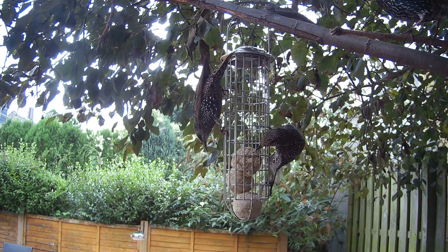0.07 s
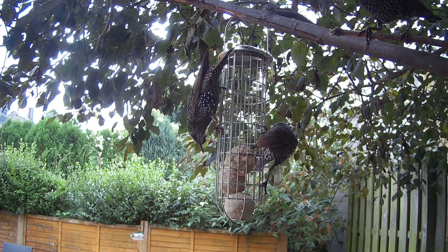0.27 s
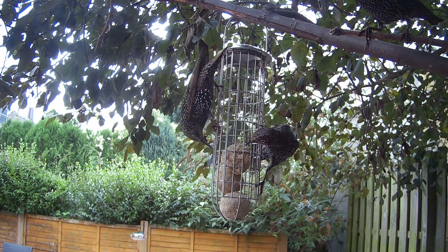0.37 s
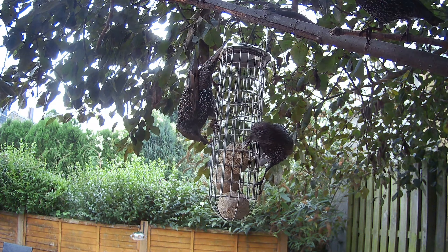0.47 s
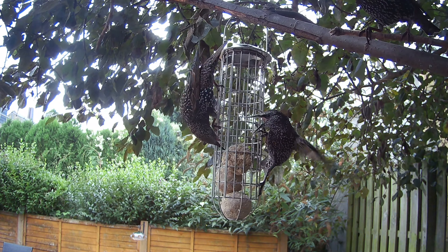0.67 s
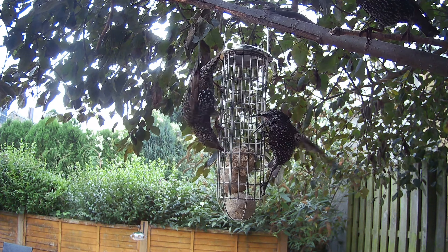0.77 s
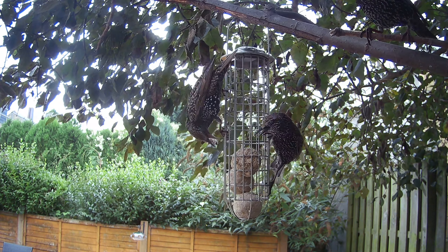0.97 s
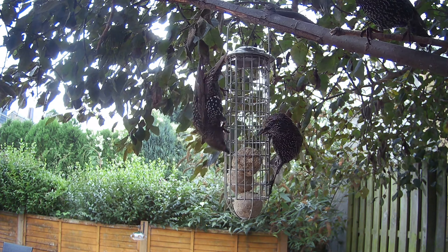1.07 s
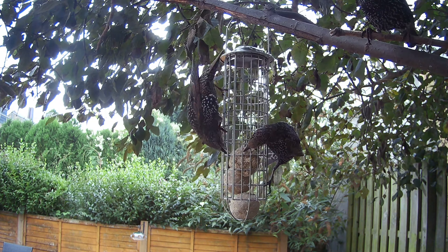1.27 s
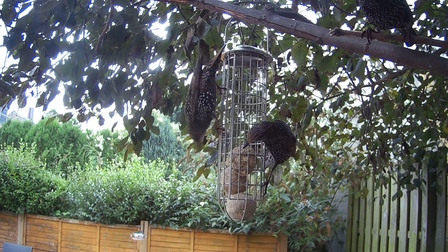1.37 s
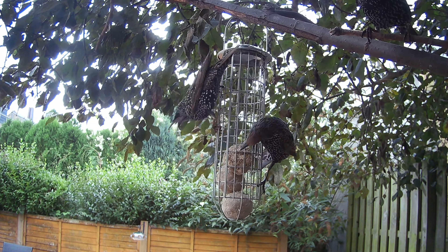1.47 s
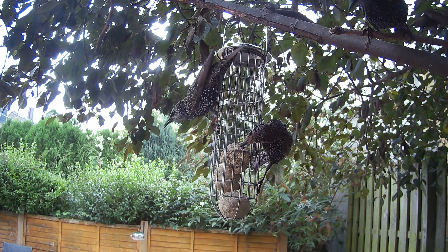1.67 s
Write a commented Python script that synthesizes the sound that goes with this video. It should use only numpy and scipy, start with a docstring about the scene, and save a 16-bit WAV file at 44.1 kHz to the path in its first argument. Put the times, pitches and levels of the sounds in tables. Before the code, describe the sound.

Starling chatter in a garden, raspy squeaks and snaps turning to high descending whistles and rapid clicking

```python
"""Starlings squabble at a garden feeder a couple of metres from a mono camera microphone, over a dull town rumble.
First a nasal squeak, then a scratchy two-voiced warble of unsteady near sines, peeps, rustling noise and
bill snaps: cracks in a broad resonance. Then thin whistles overlap, two of them falling in steps, with faint
treble hiss and a click trill that rings the throat; fences and walls give a short ring. Last the rumble, shaped
noise with a faint hum, eases off, leaving a far call and faint snaps; soft low blips come and go throughout."""
import sys
import numpy as np
from scipy import signal
from scipy.fft import rfft, irfft
from scipy.io import wavfile
from scipy.ndimage import uniform_filter1d

SR = 44100
rng = np.random.default_rng(int(sys.argv[2]) if len(sys.argv) > 2 else 0)


def persist_wave(psi):
    """Save psi, clipped to +-1, as 16-bit WAV."""
    counts = np.round(np.clip(psi, -1, 1) * 32767).astype(np.int16)
    wavfile.write(sys.argv[1], SR, np.atleast_2d(counts).T)


def natural_amplitude(level_db):
    """Convert a level in decibels to a linear amplitude factor, elementwise."""
    exponent = np.asarray(level_db, float) / 20
    return 10 ** exponent


N = 74970

# Pitch tracks of the whistles: points (t/s, f/Hz, level/dB); the ends and peeps are lists of such tracks
FIRST_FALL = [(0.53, 7540, -47), (0.535, 7770, -29), (0.5435, 8050, -21), (0.551, 7820, -15),
              (0.5645, 8460, -17), (0.587, 8230, -14), (0.5905, 8350, -19), (0.5935, 7950, -14),
              (0.5975, 8180, -17), (0.601, 7640, -16), (0.6045, 7580, -15), (0.608, 6910, -15),
              (0.614, 7110, -15), (0.621, 6720, -15), (0.625, 5230, -12), (0.636, 5660, -10),
              (0.6415, 5210, -13), (0.644, 4540, -14), (0.6505, 4670, -17), (0.6565, 4240, -23),
              (0.6585, 4610, -24), (0.666, 4090, -37)]
SECOND_FALL_START = [(0.854, 8310, -24), (0.859, 8350, -13), (0.8655, 8460, -12), (0.878, 8480, -17),
                     (0.9055, 8330, -22), (0.916, 8290, -21), (0.94, 7970, -22)]
SECOND_FALL_STEPS = [(0.943, 7990, -22), (0.9565, 7470, -22), (0.959, 6500, -16), (0.9615, 6180, -7),
                     (0.9645, 6070, -9), (0.97, 6460, -9), (0.974, 5990, -13), (0.978, 5040, -14),
                     (0.9855, 5230, -9), (0.989, 4970, -16), (0.9915, 5020, -13), (0.9955, 4520, -16),
                     (1.003, 4540, -19), (1.013, 4110, -23), (1.015, 4370, -17), (1.02, 4160, -26)]
FALL_ENDS = [
    [(.6565, 4304, -34.5), (.662, 3720, -27.5), (.666, 3755, -53)],
    [(1.012, 4341, -10.5), (1.018, 3760, -44.5), (1.022, 3850, -33)],
]
HELD_WHISTLE = [(0.622, 8030, -30), (0.6255, 8270, -27), (0.635, 8350, -20), (0.6425, 8120, -18),
                (0.6535, 8120, -16), (0.661, 8070, -20), (0.666, 8180, -15), (0.673, 8250, -16),
                (0.6755, 8440, -20), (0.677, 8400, -18), (0.68, 8590, -15), (0.686, 8740, -15),
                (0.693, 8790, -10), (0.7075, 8830, -12), (0.7225, 8720, -9), (0.727, 8590, -17),
                (0.7295, 8680, -14), (0.767, 8890, -8), (0.8025, 8870, -10), (0.819, 8740, -12),
                (0.8355, 8760, -9), (0.852, 8700, -16)]
HELD_WHISTLE_END = [(0.856, 8700, -15), (0.879, 8700, -20), (0.904, 8630, -17), (0.9165, 8660, -23),
                    (0.9345, 8530, -23), (0.9375, 8550, -26), (0.94, 8660, -34)]
PEEPS = [
    [(0.174, 6290, -42), (0.177, 4800, -33), (0.178, 5150, -34), (0.179, 5960, -34), (0.181, 6460, -28),
     (0.1835, 5810, -26), (0.185, 5710, -25), (0.2035, 5990, -28), (0.2095, 5990, -19), (0.2195, 6550, -20),
     (0.2215, 6440, -21), (0.226, 7060, -36)],
    [(0.375, 5490, -38), (0.3815, 6240, -23), (0.383, 6350, -22), (0.388, 5920, -19), (0.39, 5860, -20),
     (0.398, 6010, -14), (0.404, 5900, -18), (0.4125, 5990, -20), (0.418, 6240, -14), (0.421, 6570, -22),
     (0.424, 6520, -23)],
]
# Quiet notes under and between the whistles: points (t/s, f/Hz, level/dB); the last two are lists of tracks
UNDER_FIRST_FALL = [(0.542, 4612, -40.5), (0.552, 4559, -28.5), (0.568, 5043, -42), (0.574, 4983, -41.5),
                    (0.586, 4503, -26.5), (0.602, 4335, -35.5), (0.61, 4185, -22.5), (0.614, 4274, -59)]
UNDER_SECOND_FALL = [(0.866, 5424, -31.5), (.876, 5200, -33), (.89, 5100, -28.5), (0.902, 4839, -29),
                     (.934, 4572, -28.5), (0.963, 4230, -43), (0.989, 3770, -49), (0.999, 3520, -50)]
SMALL_NOTES = [
    [(.521, 5750, -36), (.527, 5550, -31), (.534, 5250, -42)],
    [(.878, 5550, -36), (.888, 5400, -32), (.897, 5200, -38)],
]
QUIET_NOTES = [
    [(.708, 2500, -42), (.712, 2780, -31), (.726, 2200, -37), (.742, 2020, -36), (.752, 1750, -36),
     (.757, 1550, -48)],
    [(.39, 2850, -32), (.399, 2550, -35)],
    [(.401, 1492, -39), (.43, 1497, -50)],
    [(.19, 4900, -42), (.198, 5150, -40), (.207, 4850, -39), (.216, 5300, -44)],
]
# Upper and lower voice of the warble: lists of tracks of points (t/s, f/Hz, level/dB)
UPPER_VOICE = [
    [(0.07, 3060, -41), (0.0795, 3490, -43), (0.093, 2930, -34), (0.098, 4180, -41), (0.102, 2800, -38),
     (0.1035, 4050, -38), (0.106, 4410, -31), (0.109, 2760, -33), (0.113, 4390, -40), (0.1145, 4220, -41),
     (0.1155, 3510, -40), (0.118, 2800, -33), (0.1255, 3980, -34), (0.1285, 3060, -38), (0.131, 2860, -36),
     (0.138, 3550, -29), (0.143, 3040, -37), (0.1465, 3570, -30), (0.1525, 3770, -40), (0.155, 2970, -37),
     (0.16, 2760, -32), (0.167, 3730, -32)],
    [(0.234, 3790, -36), (0.235, 3660, -34), (0.237, 3730, -29), (0.2395, 3920, -29), (0.243, 3680, -24),
     (0.2455, 3250, -29), (0.252, 2930, -19), (0.257, 3080, -19), (0.26, 3530, -20), (0.266, 2730, -22),
     (0.272, 3140, -24), (0.275, 3040, -26)],
    [(0.278, 4070, -37), (0.281, 4070, -33), (0.2835, 4330, -35), (0.293, 3340, -25), (0.296, 3340, -25),
     (0.299, 3700, -23), (0.301, 3680, -31), (0.303, 3340, -24), (0.3135, 3660, -23), (0.316, 3620, -36),
     (0.319, 3830, -25), (0.322, 3230, -25), (0.324, 3320, -26), (0.326, 3790, -25), (0.328, 3530, -32),
     (0.332, 3680, -25), (0.3365, 3140, -25), (0.3395, 3700, -28), (0.342, 3770, -38), (0.3435, 4050, -36),
     (0.3465, 3600, -26), (0.3495, 3700, -24), (0.3515, 3470, -26), (0.3535, 3810, -32), (0.356, 3920, -38),
     (0.359, 3100, -28), (0.361, 2760, -27), (0.3625, 2800, -28), (0.365, 3570, -25), (0.367, 3790, -26)],
    [(0.447, 3600, -30), (0.4565, 3270, -23), (0.4605, 3700, -27), (0.463, 3230, -31), (0.468, 2890, -23),
     (0.476, 3170, -31), (0.479, 2970, -26), (0.483, 2690, -34), (0.487, 2970, -29), (0.49, 2910, -30),
     (0.492, 3320, -34), (0.496, 2970, -28), (0.5045, 3120, -29), (0.5075, 3400, -39), (0.5105, 3400, -34),
     (0.512, 3210, -35)],
    [(0.477, 4030, -37), (0.483, 3750, -29), (0.4875, 3400, -34), (0.4895, 3470, -35), (0.497, 3010, -28)],
]
LOWER_VOICE = [
    [(0.047, 2730, -40), (0.051, 2760, -32), (0.053, 2260, -36), (0.056, 2020, -34), (0.0595, 2170, -33),
     (0.0645, 2910, -29), (0.071, 2090, -38), (0.078, 2650, -41), (0.0805, 2200, -43), (0.084, 2070, -41),
     (0.086, 2480, -45), (0.089, 2350, -49), (0.09, 2610, -50)],
    [(0.118, 2840, -31), (0.1205, 2710, -37), (0.1215, 2280, -39), (0.1235, 2390, -37), (0.129, 1850, -41),
     (0.1345, 2330, -46), (0.1425, 1740, -46), (0.147, 2260, -43), (0.1545, 1770, -46), (0.166, 2020, -46)],
    [(0.277, 2730, -33), (0.28, 2450, -33), (0.2845, 2950, -30), (0.29, 2300, -37), (0.292, 2780, -37)],
    [(0.322, 2690, -33), (0.3345, 1810, -38), (0.34, 2330, -35), (0.3435, 2240, -38), (0.347, 1770, -44),
     (0.3555, 2220, -35), (0.3585, 1890, -38), (0.3635, 2090, -42), (0.366, 1920, -45)],
]
# Nasal opening note: points (t/s, f/Hz, level/dB)
SQUEAK = [(.022, 1250, -55), (.036, 1150, -45), (.048, 1250, -46)]
# Lift of the squeak's first three harmonics, in order: (level/dB)
SQUEAK_HARMONICS = [0, 2, -2]
# Bill snaps: (t/s, peak level of the crack/dB, centre f/Hz, knock level against the crack/dB)
SNAPS = [(.1003, -21, 3000, -14), (.1685, -16, 3500, -18), (.3037, -10, 3200, -12), (.3049, -15, 3000, -12),
         (.311, -21, 2200, -10), (.3697, -11, 3000, -10), (.5105, -31, 1200, -4), (.5141, -18, 2600, -9),
         (.6172, -7, 4300, -12), (.748, -32, 2500, -10), (.2578, -27, 5000, -20), (.2775, -31, 7000, -20),
         (1.2695, -44, 6500, -9), (1.292, -59, 6800, -30), (1.305, -58, 6800, -30), (1.497, -57, 3800, -10),
         (1.5448, -54, 8500, -30), (1.562, -57, 8500, -30), (1.627, -57, 6500, -20)]
# Clicks of the trill: (t/s)
TRILL_CLICKS = [.732, .739, .748, .7595, .774, .7915, .8075, .822, .836, .846, .8557, .864, .872, .880,
                .8875, .895, .902, .910, .917, .924, .932, .939]
# Swell of the trill's clicks, before their scatter: (t/s, level/dB)
TRILL_SWELL = [(.73, -33), (.77, -30), (.846, -28.5), (.9, -31.5), (.94, -29.5)]
# Throat resonances of the trill: (f/Hz, width/Hz, level at first click/dB, level at last click/dB)
TRILL_THROAT = [(2900, 450, -6.5, -1.5), (4540, 780, 10.5, 2), (6995, 500, 9, -2)]
# Wing and feather rustle: (start t/s, length/s, level/dB, centre f/Hz, width/Hz)
RUSTLES = [(.018, 0.081, -48.5, 3370, 5950), (0.094, 0.22, -46, 5740, 2640),
           (0.219, 0.064, -35, 5830, 2500), (.388, 0.078, -25, 5370, 3250), (.39, 0.035, -51, 8600, 1500),
           (.28, 0.32, -44, 5500, 3030), (.43, 0.58, -44, 5500, 4040), (.505, 0.035, -38.5, 2200, 2980),
           (0.099, 0.032, -31, 3400, 2500), (0.298, 0.03, -31, 2600, 2520), (0.323, 0.017, -35, 3600, 1987),
           (.615, 0.039, -37.5, 2500, 3090), (1.068, 0.016, -52.5, 2546, 3020),
           (1.472, 0.075, -65.5, 4510, 4950)]
# Faint hiss that flares over the loud whistles: (start t/s, length/s, level/dB, centre f/Hz, width/Hz)
TREBLE_HISS = [(.55, 0.14, -43.5, 13520, 2996), (.615, 0.054, -28, 11000, 1200),
               (.73, 0.25, -43, 10900, 1400), (.745, 0.093, -52, 13600, 1414),
               (.83, 0.11, -46, 12800, 3000), (.965, .06, -45, 12500, 1500)]
# Far call: list of tracks of points (t/s, f/Hz, level/dB)
FAR_CALL = [
    [(1.295, 1650, -68), (1.33, 1780, -62), (1.36, 2050, -62.5), (1.39, 2250, -62), (1.405, 2750, -62),
     (1.425, 2950, -61), (1.455, 2900, -73)],
    [(1.26, 3410, -67), (1.29, 3050, -73), (1.335, 3200, -85)],
    [(1.39, 3100, -68), (1.41, 3600, -62.5), (1.43, 3300, -73)],
]
# Faint low blips from afar: (start t/s, length/s, f/Hz, level/dB)
BLIPS = [(0.215, 0.043, 615, -46), (0.263, 0.087, 475, -48), (0.43, 0.015, 600, -38),
         (0.431, 0.057, 530, -50), (0.679, .07, 530, -43.5), (0.77, 0.059, 520, -50.5),
         (1.55, 0.043, 530, -63), (1.626, 0.032, 475, -56)]
# Colour of the town rumble: (f/Hz, relative level per Hz/dB)
TOWN_COLOUR = [(12, -47), (20, -4), (64, -6.5), (98, -9.5), (191, -13), (259, -10), (289, -13.5),
               (519, -14), (686, -17), (2270, -25.5), (8500, -31.5), (12000, -26.5), (15500, -30.5)]
# Course of the town rumble, before a 1.5 dB lift: (t/s, level/dB)
TOWN_COURSE = [(0, -50), (.05, -52.5), (.4, -45.5), (.7, -47), (.96, -47.5), (1.1, -50.5), (1.2, -60),
               (1.35, -59), (1.7, -60.5)]
# Hum partials: (f/Hz), and in the same order their (level/dB)
HUM_PITCHES = [263, 525]
HUM_LEVELS = [-60.5, -69.5]

WHISTLE_THROAT_HZ, WARBLE_THROAT_HZ = 8980, 6200  # where the throat favours the octave
WARBLE_WOBBLE = .014  # rms share of the pitch
WARBLE_FLUTTER_DB, WARBLE_BREATH_DB = 2.0, -9


def seconds():
    """Time of every sample."""
    return np.arange(N) / SR


def unit(x):
    """Scale to rms 1."""
    return x / np.sqrt(np.mean(x ** 2))


def band(x, hz, width_hz):
    """Two-pole resonance, with its sharpness kept at 0.3 or more."""
    return signal.lfilter(*signal.iirpeak(hz, max(hz / width_hz, .3), fs=SR), x)


def steep_band(x, hz, width_hz):
    """Two resonances in a row, the second twice as wide."""
    return band(band(x, hz, width_hz), hz, 2 * width_hz)


def walk(rate):
    """Smooth chance, about rate turns a second, spread 1."""
    k = int(SR / rate)
    return unit(uniform_filter1d(uniform_filter1d(rng.standard_normal(N), k), k))


def gate(t0, t1, edge=0.0033):
    """Fades in over the edge (s) up to t0 and out over the edge after t1."""
    return np.clip(np.minimum(seconds() - t0 + edge, t1 + edge - seconds()) / edge, 0, 1)


def voice(notes, octave_db, octave_hz, wobble, flutter_db, breath_db):
    """Syrinx tone: near sine, unsteady in pitch and level, breath around it; the throat favours some overtones."""
    out, t = 0, seconds()
    favoured_width_hz = 1700
    twelfth_db, twelfth_hz = -37, 14000
    for note in notes:
        s, hz, db = np.array(note).T
        glide = uniform_filter1d(np.interp(t, s, hz), size=40)
        pitch = glide * (1 + wobble * walk(400))
        phase = 2 * np.pi * np.cumsum(pitch) / SR
        octave_gain = natural_amplitude(octave_db) / (1 + ((2 * pitch - octave_hz) / favoured_width_hz) ** 4)
        twelfth_gain = natural_amplitude(twelfth_db) / (1 + ((3 * pitch - twelfth_hz) / favoured_width_hz) ** 4)
        tone = np.sin(phase) + octave_gain * np.sin(2 * phase) + twelfth_gain * np.sin(3 * phase)
        breath = natural_amplitude(breath_db) * walk(2500)  # fast chance spreads noise around the tone
        flutter = natural_amplitude(flutter_db * walk(380))
        level = np.sqrt(2) * natural_amplitude(np.interp(t, s, db)) * gate(s[0], s[-1])
        out = out + level * (flutter + breath) * tone
    return out


def whistles():
    """Thin, steady syrinx tones: two stepped falls, a held note and peeps."""
    # the last two points of each fall give way to its end track
    falls = [FIRST_FALL[:-2], SECOND_FALL_START + SECOND_FALL_STEPS[:-2]] + FALL_ENDS
    notes = falls + [HELD_WHISTLE + HELD_WHISTLE_END] + PEEPS
    return voice(notes, -16, WHISTLE_THROAT_HZ, wobble=.002, flutter_db=1.0, breath_db=-37)


def warble():
    """Two rough syrinx voices at once, scratchy from wobble, flutter and breath."""
    return voice(UPPER_VOICE + LOWER_VOICE, -24, WARBLE_THROAT_HZ,
                 WARBLE_WOBBLE, WARBLE_FLUTTER_DB, WARBLE_BREATH_DB)


def snaps():
    """Each snap is a very short crack in a broad resonance, with a duller knock under it."""
    out = 0
    decay_s, width_hz, knock_hz = .0007, 2500, 1500
    for s, db, hz, knock_db in SNAPS:
        late = seconds() - s
        hit = rng.standard_normal(N) * (late >= 0) * np.exp(-np.abs(late) / decay_s)
        crack = steep_band(hit, hz, width_hz)
        knock = band(hit, knock_hz, knock_hz)
        crack = crack / np.abs(crack).max()
        knock = knock / np.abs(knock).max()
        out = out + natural_amplitude(db) * (crack + natural_amplitude(knock_db) * knock)
    return out


def trill():
    """Single clicks ring the throat, whose low resonance gains along the trill while the upper ones weaken."""
    scatter_db = 2.2 * rng.standard_normal(len(TRILL_CLICKS))
    swell_db = np.interp(TRILL_CLICKS, *np.array(TRILL_SWELL).T)
    clicks = np.zeros(N)
    clicks[(np.array(TRILL_CLICKS) * SR).astype(int)] = natural_amplitude(swell_db + scatter_db)
    out = 0
    for hz, width_hz, start_db, end_db in TRILL_THROAT:
        ring = steep_band(clicks, hz, width_hz) * SR / (4 * width_hz)  # evens out ring height across widths
        drift_db = np.interp(seconds(), [TRILL_CLICKS[0], TRILL_CLICKS[-1]], [start_db, end_db])
        out = out + ring * natural_amplitude(drift_db)
    return out


def squeak():
    """A short rough note of three harmonics, each sung as a voice of its own."""
    notes = [[(s, (k + 1) * hz, db + lift_db) for s, hz, db in SQUEAK]
             for k, lift_db in enumerate(SQUEAK_HARMONICS)]
    return voice(notes, -36, WARBLE_THROAT_HZ, WARBLE_WOBBLE, WARBLE_FLUTTER_DB, WARBLE_BREATH_DB)


def soft_notes():
    """Quiet, breathy syrinx tones with almost no octave."""
    notes = [UNDER_FIRST_FALL, UNDER_SECOND_FALL] + SMALL_NOTES + QUIET_NOTES
    return voice(notes, -58.5, WHISTLE_THROAT_HZ, wobble=.014, flutter_db=WARBLE_FLUTTER_DB, breath_db=-11)


def noise_bursts(table):
    """Grainy band of noise that starts fast and fades: rustle or hiss, by its pitch."""
    out = 0
    for s, length, db, hz, width_hz in table:
        x = np.clip((seconds() - s) / length, 0, 1)
        swell = np.sin(np.pi * x ** .6)
        noise = unit(steep_band(rng.standard_normal(N), hz, width_hz))
        out = out + natural_amplitude(db + 3.2 * walk(400)) * swell * noise  # 3.2 dB rms of grain
    return out


def far_call():
    """Faint syrinx tones, blurred by strong wobble and breath."""
    return voice(FAR_CALL, -45, WARBLE_THROAT_HZ, wobble=.06, flutter_db=WARBLE_FLUTTER_DB, breath_db=-1)


def blips():
    """Short low sines that swell and fade softly."""
    out, t = 0, seconds()
    for s, length, hz, db in BLIPS:
        swell = np.sin(np.pi * np.clip((t - s) / length, 0, 1))
        out = out + natural_amplitude(db) * swell * np.sin(2 * np.pi * hz * t)
    return out


def town():
    """Dull rumble: noise coloured in its spectrum, then levelled over time."""
    f = np.arange(N // 2 + 1) * SR / N + 1  # 1 Hz up, clear of log 0
    hz, db = np.array(TOWN_COLOUR).T
    colour = natural_amplitude(np.interp(np.log(f), np.log(hz), db))
    noise = irfft(rfft(rng.standard_normal(N)) * colour, N)
    return unit(noise) * natural_amplitude(np.interp(seconds(), *np.array(TOWN_COURSE).T) + 1.5)


def hum():
    """Faint steady sines whose levels waver slowly, by 3 dB rms."""
    return sum(natural_amplitude(db + 3.0 * walk(8)) * np.sin(2 * np.pi * hz * seconds())
               for hz, db in zip(HUM_PITCHES, HUM_LEVELS))


def garden(x, tail_db):
    """One near echo and a dense, duller fading tail from fences and walls; a far wall swells it once."""
    t = seconds()[:SR // 2]
    t60_s, gap_s = 0.22, 0.0028
    far_wall_s, far_smear_s, far_wall_db = 0.12, 0.0067, 3
    echo_s, echo_db = .012, -22
    dull = signal.butter(2, [2600, 6370], "band", fs=SR)
    tail = signal.lfilter(*dull, rng.standard_normal(len(t)))
    far_swell_db = far_wall_db * np.exp(-((t - far_wall_s) / far_smear_s) ** 2)
    tail = tail * natural_amplitude(-60 * t / t60_s + far_swell_db) * (t > gap_s)
    tail = tail * natural_amplitude(tail_db) / np.sqrt(np.sum(tail ** 2))
    tail[0] = 1  # direct sound
    tail[int(echo_s * SR)] = natural_amplitude(echo_db)
    return signal.fftconvolve(x, tail)[:N]


def scene():
    """Birds in the garden over the town."""
    birds = whistles() + soft_notes() + far_call() + trill() + noise_bursts(RUSTLES)
    near_birds = warble() + squeak() + snaps()  # nearer, so drier
    in_garden = garden(birds, -13.5) + garden(near_birds, -15)
    backdrop = noise_bursts(TREBLE_HISS) + blips() + town() + hum()
    return (in_garden + backdrop)[None]


def band_limit(x):
    """A steep low-pass at the top of the band."""
    return signal.sosfilt(signal.butter(12, 15740, fs=SR, output="sos"), x)


def record(dry):
    """The microphone shelves off above the whistles; the camera cuts the top."""
    shelf = signal.butter(8, 9900, fs=SR, output="sos")
    low = signal.sosfiltfilt(shelf, dry)
    shelved = low + natural_amplitude(-14.5) * (dry - low)
    top_cut = signal.ellip(8, .2, 70, 15750, fs=SR, output="sos")
    mix = signal.sosfilt(top_cut, shelved)
    return band_limit(mix)


dry = scene()
out = record(dry)
persist_wave(out)
```